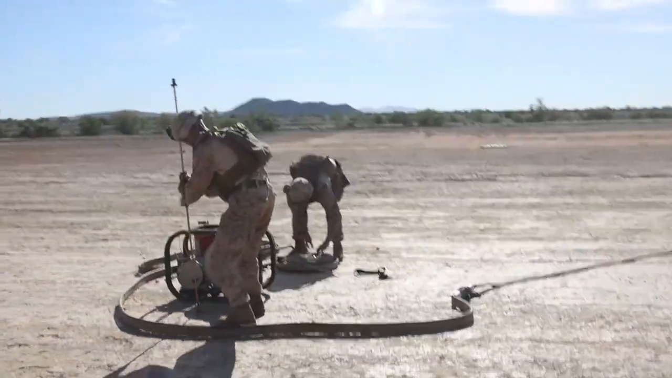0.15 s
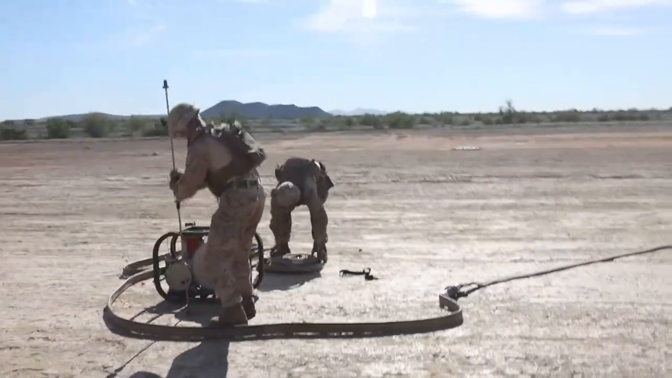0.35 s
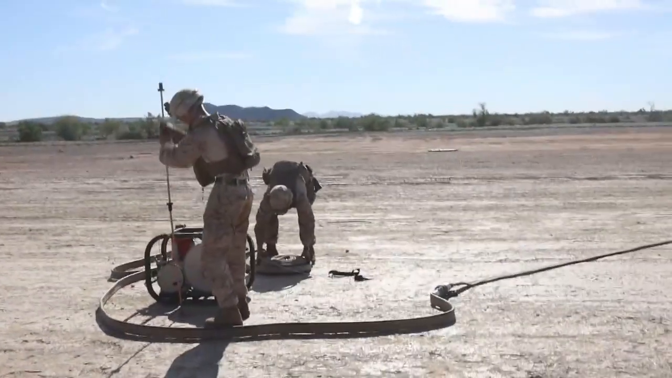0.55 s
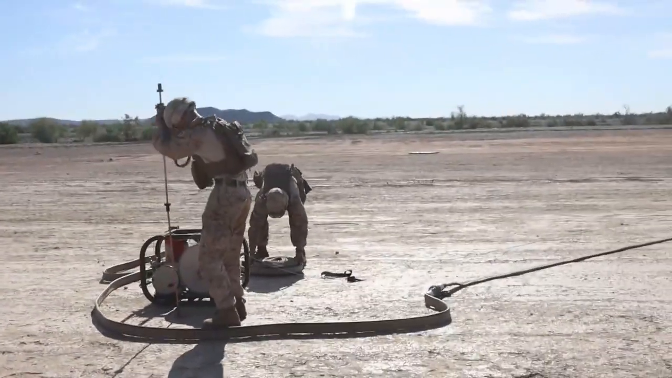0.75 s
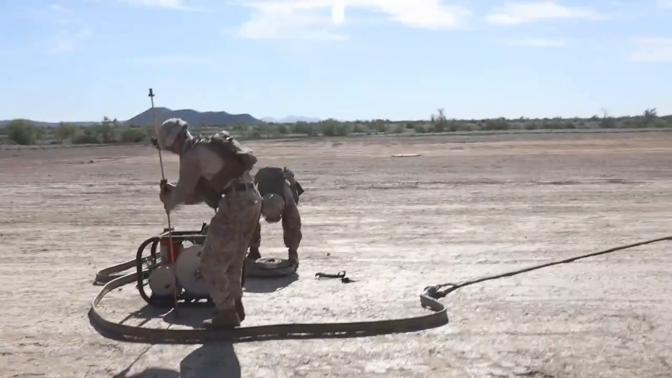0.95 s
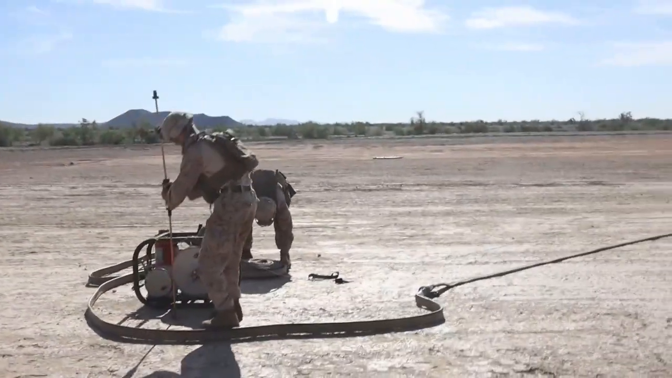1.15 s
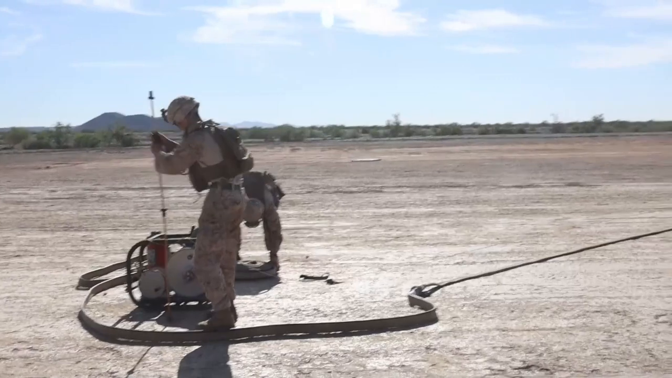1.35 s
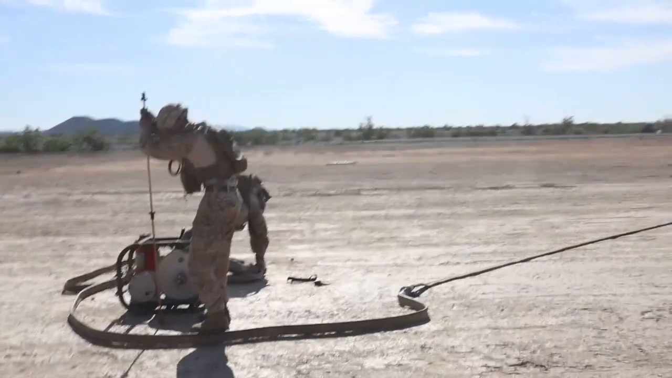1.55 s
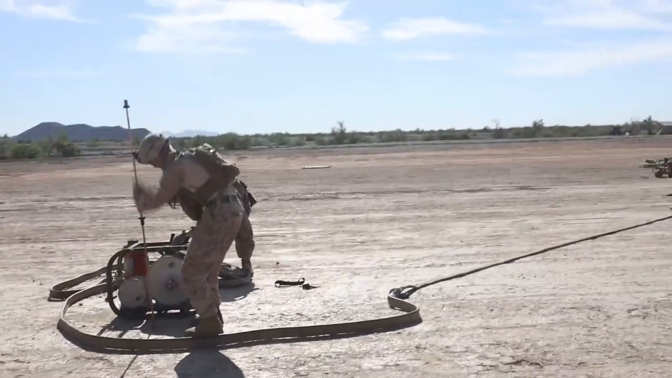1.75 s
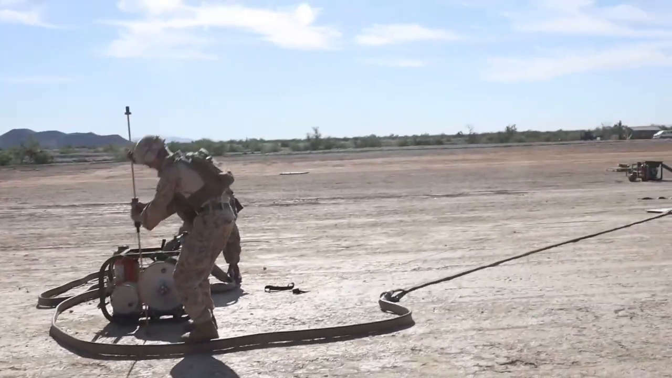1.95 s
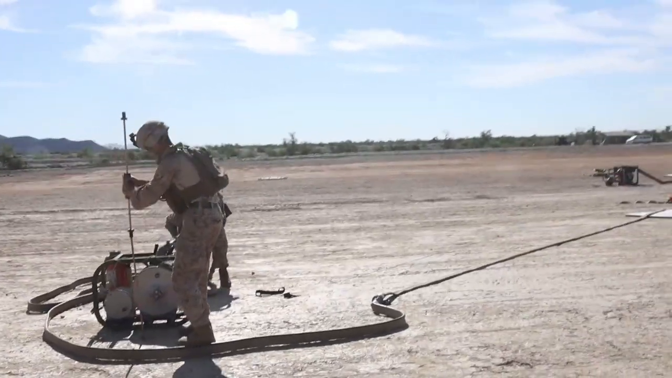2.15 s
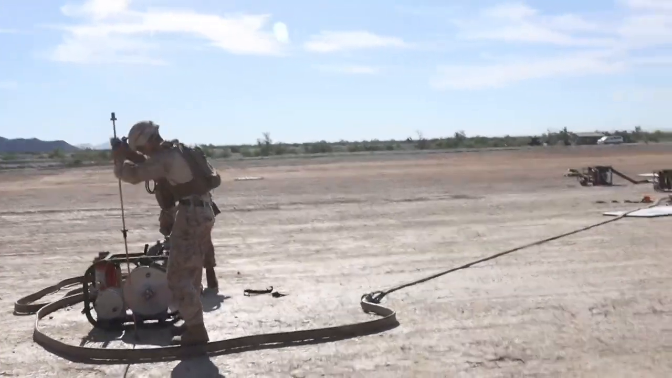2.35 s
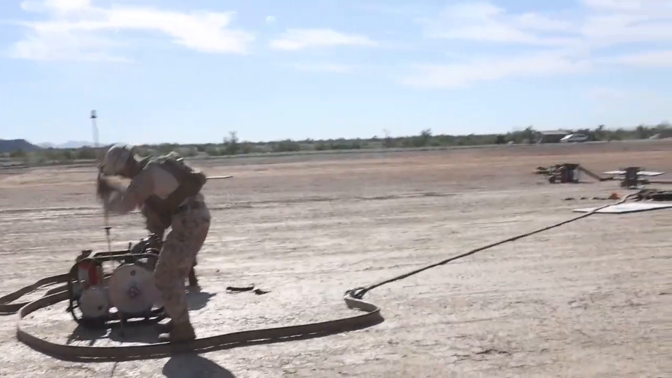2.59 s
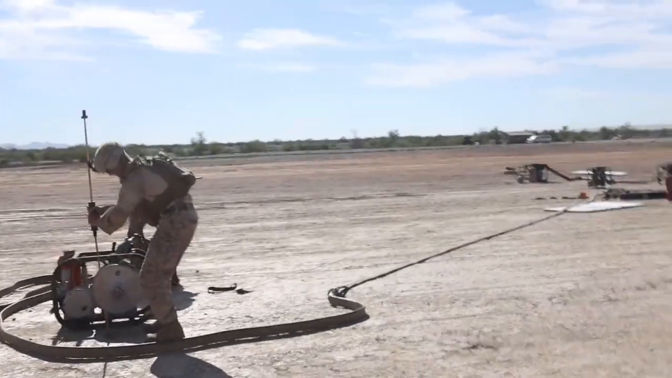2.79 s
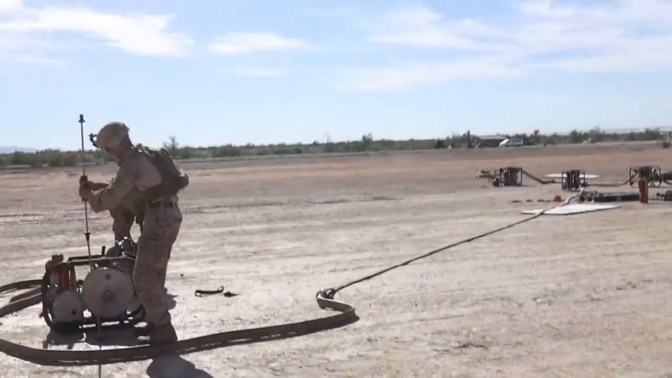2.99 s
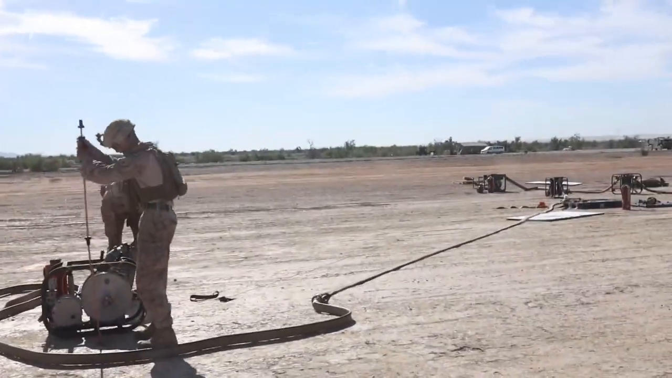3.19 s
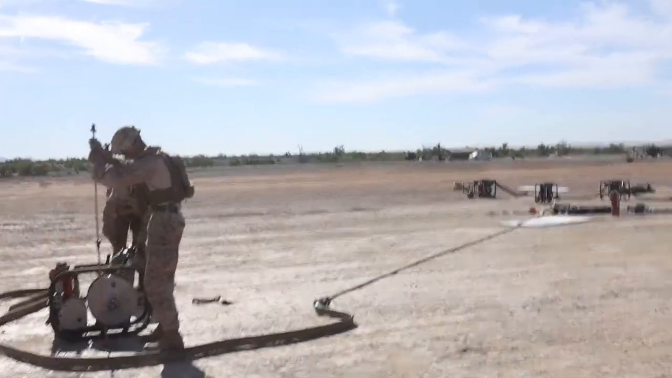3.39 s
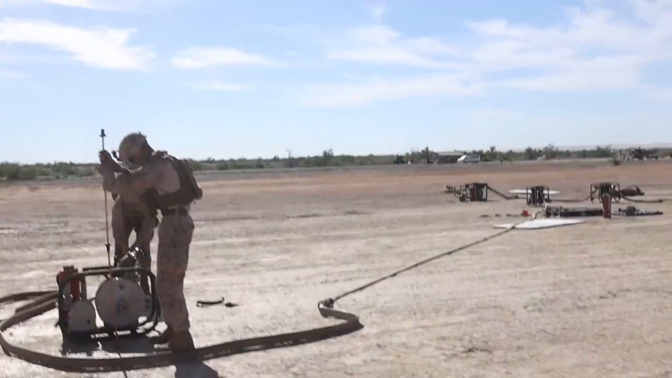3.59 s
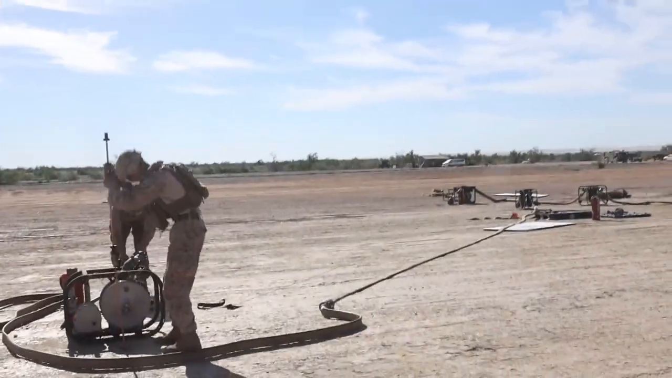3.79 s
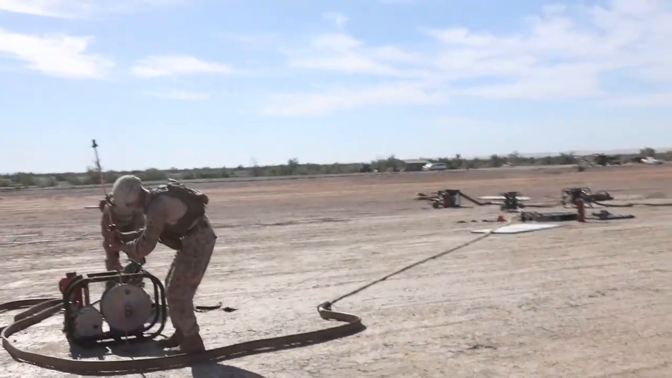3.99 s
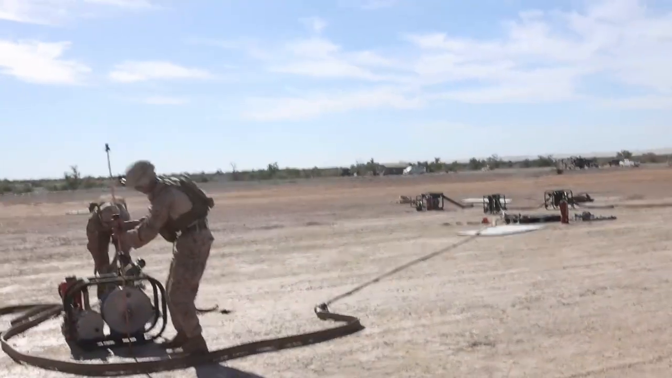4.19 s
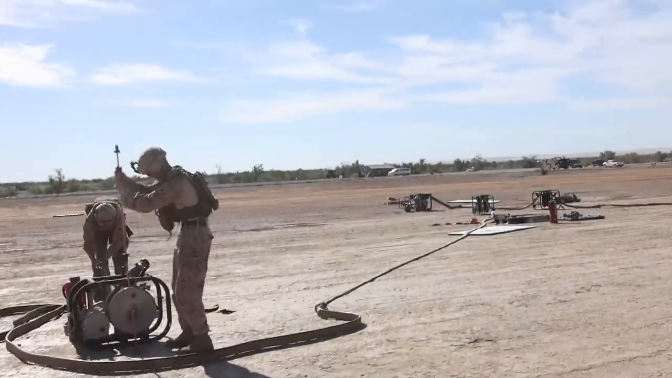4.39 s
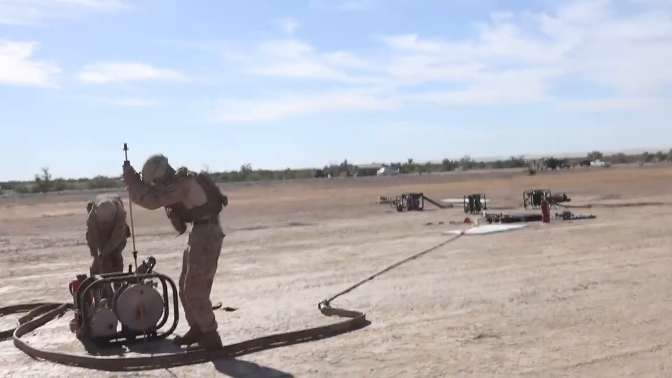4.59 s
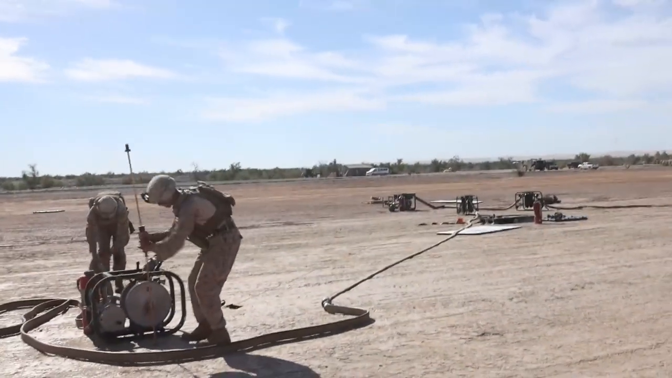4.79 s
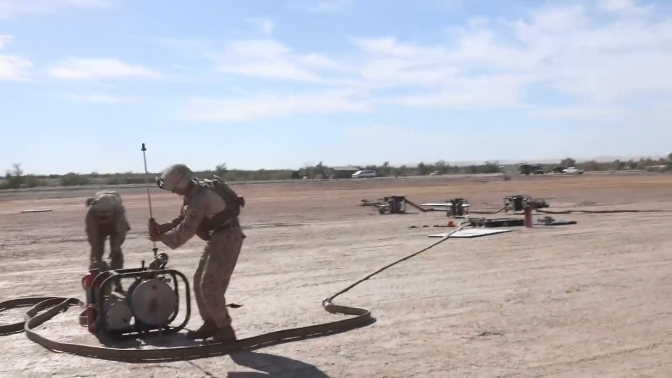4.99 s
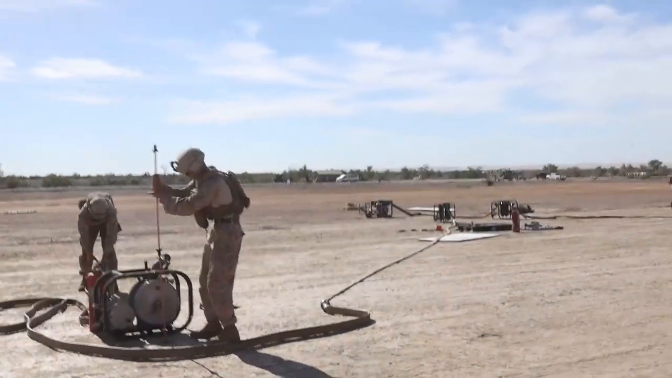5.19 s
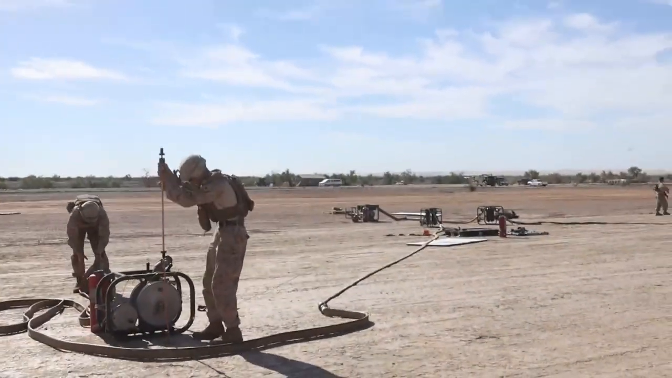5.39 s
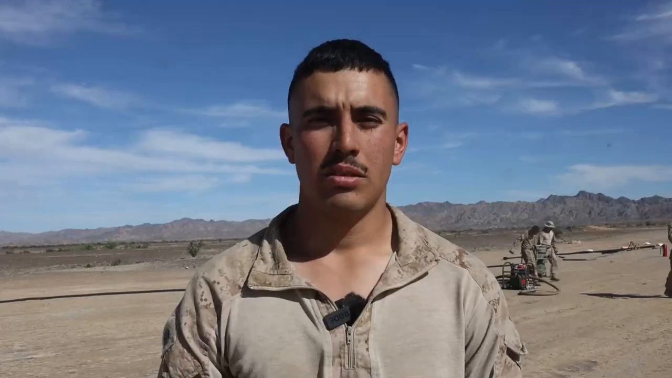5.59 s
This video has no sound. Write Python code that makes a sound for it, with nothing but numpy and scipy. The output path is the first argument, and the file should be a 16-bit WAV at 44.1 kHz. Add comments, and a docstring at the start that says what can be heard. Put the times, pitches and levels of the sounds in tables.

```python
"""Hammering a steel rod into the ground

Six blows of a sliding hammer drive an earthing rod into dry, open ground. Each time the weight
chatters on its stop, rings the rod and hops twice. Between blows it is dragged up and thrown down,
scraping and clinking, and now and then a boot scuffs. Wind buffets the microphone's two openings
(ports), mostly the right one, and dies down over a faint, far rumble."""
import sys
import numpy as np
from scipy import signal
from scipy.fft import rfft, irfft
from scipy.io import wavfile
from scipy.ndimage import uniform_filter1d

SR = 44100
rng = np.random.default_rng(int(sys.argv[2]) if len(sys.argv) > 2 else 0)


def dump_mix(stems):
    """Bounce the given channels to the path in sys.argv[1] as a 16-bit WAV at rate SR."""
    frames = np.atleast_2d(stems).T  # one column per channel
    limited = np.clip(frames, -1, 1)  # hard clip at full scale
    pcm = np.round(limited * 32767).astype(np.int16)
    wavfile.write(sys.argv[1], SR, pcm)


N = 249165
T = np.arange(N) / SR
EVENT_T = T[:SR // 4]  # time within one short sound; a "t60" is the time it takes to fade by 60 dB

# tone of the far rumble (frequency [Hz], level [dB])
RUMBLE_TONE = [(25, -17.5), (60, -4.5), (120, 0.5), (250, -6), (450, -16.5), (800, -24), (1500, -30.5),
               (3000, -36), (8000, -44.5), (15000, -51.5)]
# tone of the swirling air in a strong gust (frequency [Hz], level [dB])
GUST_TONE = [(20, -25), (45, -17), (90, -1.5), (190, 1.5), (330, -3), (550, -12), (800, -22), (1200, -36),
             (2000, -50.5), (4000, -82)]
# wind strength on each port (time [s], relative level [dB])
LEFT_WIND = [(0.0, -51.5), (0.16, -71.5), (2.56, -71.5), (2.72, -63.5), (2.92, -53), (3.24, -54.5),
             (3.32, -51), (3.52, -69), (3.68, -57), (4.0, -70), (4.28, -65), (4.64, -67.5), (4.88, -66.5),
             (5.64, -75)]
RIGHT_WIND = [(0.0, -43.5), (0.72, -39.5), (1.2, -45), (1.68, -41.5), (1.96, -46), (2.08, -44), (2.48, -42),
              (3.16, -58), (3.4, -49.0), (3.56, -56.5), (3.84, -47.5), (3.96, -67), (4.12, -60.5),
              (4.32, -68), (4.48, -66), (5.32, -65), (5.36, -65), (5.64, -83)]
# sharp swirls of air on the right port (time [s], level [dB])
SWIRLS = [(0.129, -29.5), (0.427, -27.5), (0.487, -28), (0.68, -23.5), (0.845, -32), (0.952, -19.5),
          (0.967, -26), (1.047, -29.5), (1.514, -27), (1.558, -29.5), (1.681, -26.5), (2.107, -30),
          (2.276, -29.5), (2.355, -28)]
# low puffs of air and dull scuffs of boots
# (time [s], left level [dB], right level [dB], upper edge [Hz], t60 [s])
PUFFS_AND_SCUFFS = [(0.070, -49, -38.5, 600, 0.045), (0.696, -59, -34.5, 457, 0.034),
                    (1.372, -51, -51, 503, 0.033), (1.923, -54, -39.5, 444, 0.054),
                    (2.968, -40, -55, 284, 0.059), (3.154, -44, -60.5, 482, 0.046),
                    (4.111, -67, -50.5, 248, 0.041), (4.264, -51.5, -65, 344, 0.15),
                    (4.436, -53, -52, 600, 0.15), (5.012, -51.5, -53.5, 450, 0.058),
                    (5.037, -51.5, -51, 714, 0.067), (5.173, -70, -59, 910, 0.034),
                    (5.265, -64.5, -56.5, 302, 0.068), (5.37, -78, -56, 256, .06)]
# the rod's own ringing tones (frequency [Hz], level [dB], t60 [s])
ROD_TONES = [(765, -10, .05), (2045, 2, .09), (2260, -8, .06), (2620, -7, .05), (3455, 4, .11),
             (4100, -8, .05), (4660, -8, .06), (4975, -2, .075), (5820, 0, .07), (6035, -5, .06),
             (6440, -5, .06), (6630, -4, .06), (6790, -4, .05), (7415, -7, .08), (7790, -7, .08),
             (8025, -7, .08), (8540, -4, .11), (9460, -9, .09), (9590, -10, .08), (10550, -12, .08),
             (11600, -7, .09), (12340, -11, .08), (12500, -10, .08), (13200, -11, .06), (13950, -10, .1)]
# tone of steel rubbing on steel (frequency [Hz], level [dB])
SCRAPE_TONE = [(300, -12), (800, -4), (1400, -1.5), (2300, 3), (3000, -0.5), (4000, 0), (6500, -5),
               (9000, -14.5), (15000, -22.5)]
# the weight is dragged up (middle time [s], length [s], hiss [dB], singing [dB])
WEIGHT_LIFTS = [(0.083, 0.18, -77.5, -83), (0.54, 0.29, -82, -87.5), (1.325, .17, -70, -70.5),
                (2.235, 0.32, -85, -80.5), (3.053, 0.18, -77.5, -74), (3.389, .3, -84, -93),
                (4.354, 0.29, -83, -73.5), (5.186, 0.28, -83, -74.5)]
# the throw before each blow and the hop after it (singing [dB], flight [s], relative landing level [dB])
WEIGHT_THROWS = [(-77.5, .05, -53), (-79.5, .0833, -50.5), (-79.5, .0764, -53), (-81, .0812, -49),
                 (-69.5, .088, -54), (-65, .1162, -68.5)]
# tone of a light sideways knock (frequency [Hz], level [dB])
KNOCK_TONE = [(200, -19.5), (900, -7), (1300, 1.5), (2100, -4), (2900, 5), (3450, 2), (4200, 5), (6200, 10),
              (9500, -15), (14000, -19), (16000, -18)]
# light knocks of the weight on the rod, and a few dull boot scuffs
# (time [s], relative level [dB], brightness [dB per octave])
KNOCKS_AND_SCUFFS = [(0.0527, -61.5, -3.5), (0.6095, -64, -5), (1.1269, -56, -6), (1.1995, -54.5, -1.5),
                     (1.2490, -53, 0.5), (1.3, -54.5, 1), (1.3462, -55.5, -4.5), (1.439, -61, -1),
                     (1.794, -70, -4), (2.0812, -58.5, -1.5), (2.114, -62.5, -1.5), (2.9327, -58, 0.5),
                     (3.0700, -65, 2), (3.2441, -71.5, -9.5), (3.4015, -64.5, -8.5), (3.6650, -67, 0),
                     (4.4000, -71, 0), (4.803, -54.5, -0.5), (5.0630, -66, -6), (5.1922, -61.5, 2)]
# a blow's crack: many short-lived tones between the ringing ones (frequency [Hz], level [dB])
CRACK_TONE = [(60, -20), (160, 0), (450, -17), (780, -7), (1150, -8.5), (1600, -4), (2200, -2),
              (2900, -3.5), (3600, -2.5), (4400, 1), (6300, -4), (9500, -8), (14500, -12), (16000, -24.5)]
# the close tones that the weight drives hardest (frequency [Hz], level [dB])
CLANG_TONES = [(3270, -10), (3450, 0), (3640, -14)]
# hammer blows (time [s], level [dB], clang [dB], upper tone [dB], brightness [dB per octave],
# rebound delay [s], rebound level [dB])
HAMMER_BLOWS = [(0.193, -29, -6, -8, 0, 0.0071, -3), (0.9872, -29.5, 1, -10.5, 0, 0.0092, -6),
                (1.8208, -30, -3.5, -12, -0.4, 0.0054, -2.5), (2.6622, -28.5, 6.5, -9.5, -1, 0.0062, -4.5),
                (3.9845, -30.5, 4.5, -14, 1, .0064, -6), (4.821, -30, 6.5, -18.5, -0.1, 0.0071, -6.5)]

SING_HZ, SING_T60_S = 3450, .045  # the rod's main tone, which sings on after a slip or knock
STRONG_WIND_DB = -39


def undb(db):
    """Turn decibels into a gain."""
    return 10 ** (np.asarray(db) / 20)


def unit(x):
    """Scale to an average power of 1."""
    return x / np.sqrt(np.mean(x ** 2))


def burst(x):
    """Scale to the energy of 10 ms at power 1."""
    return x / np.sqrt(np.sum(x ** 2) / (SR / 100))


def level_at(points, hz):
    """Read a curve of (frequency [Hz], level [dB]) points, spaced by octaves."""
    frequencies, db = np.transpose(points)
    return np.interp(np.log(hz + 1), np.log(frequencies), db)


def colour(x, points, size=2048):
    """Filter a sound to follow a tone curve."""
    cepstrum = irfft(np.log(undb(level_at(points, np.fft.rfftfreq(size, 1 / SR)))))
    cepstrum[1:size // 2] *= 2  # folded forward, so the filter never rings ahead of the sound
    cepstrum[size // 2 + 1:] = 0
    return signal.fftconvolve(x, irfft(np.exp(rfft(cepstrum))))[:len(x)]


def tilt(x, octave_db):
    """Brighten or dull a sound around 4 kHz."""
    return colour(x, [(1000, -2 * octave_db), (16000, 2 * octave_db)])


def wander(per_s, size=N):
    """A smooth random wobble, about 1 in size."""
    hold = max(int(SR / per_s), 2)
    steps = np.repeat(rng.standard_normal(size // hold + 1), hold)
    return unit(uniform_filter1d(uniform_filter1d(steps, hold), hold)[:size])


def fade(t60, start=0):
    """A level that jumps to 1 at the start time and dies away."""
    return (EVENT_T >= start) * np.exp(-np.log(1000) * np.abs(EVENT_T - start) / t60)


def add(out, s, x):
    """Mix a sound in at s seconds."""
    i = max(int(s * SR), 0)
    out[..., i:i + x.shape[-1]] += x[..., :N - i]


def far_rumble(level_db=-72, side_db=-5):
    """The open plain rumbles faintly, a little differently left and right."""
    middle, side = (unit(colour(rng.standard_normal(N), RUMBLE_TONE)) for _ in range(2))
    return undb(level_db) * (middle + undb(side_db) * side * np.array([[1], [-1]]))


def gusts(curve, steady_db=1.5, fitful_db=3.5, weak_below_db=-60):
    """Wind strength in dB: fairly steady when strong, fitful when weak."""
    db = np.interp(T, *np.transpose(curve))
    weak = 1 / (1 + undb(db - weak_below_db))
    return db + (steady_db * (1 - weak) + fitful_db * weak) * wander(per_s=8.2)


def buffeting(level_db):
    """Air churns on one port: faster air is louder and sheds smaller, higher-pitched swirls."""
    speed = np.maximum(2 ** ((level_db - STRONG_WIND_DB) / 19), .42)  # an octave higher every 19 dB
    flutter = wander(per_s=170)
    out, power = 0, 0
    for hz in 28 * 2 ** (np.arange(14) / 2):
        gain = undb(level_at(GUST_TONE, hz / speed))
        half_octave = signal.butter(3, [hz / 1.19, hz * 1.19], "band", fs=SR, output="sos")
        band = signal.sosfilt(half_octave, rng.standard_normal(N))
        spurts = unit(undb(min(hz / 90, 5.5) * flutter))  # small swirls arrive in spurts
        out += gain * band * spurts
        power += gain ** 2 * np.var(band)
    return out / np.sqrt(power) * undb(level_db - 1)


def swirl(hz):
    """One small swirl of air crosses a port: a single swing of pressure."""
    position = 2 * np.pi * hz * EVENT_T[:SR // 40] - 4
    return position * np.exp(-position ** 2 / 2)


def crackle(level_db, count=330, base_hz=330):
    """Stray swirls of all sizes pop on a port, sharper in a strong gust."""
    out = np.zeros(N)
    for when, size, pitch, side in rng.random((count, 4)):
        wind_db = level_db[int(when * N)]
        octaves = pitch - .5 + max((wind_db - STRONG_WIND_DB) / 24, -1)
        pop_db = wind_db - 3 - 3 * np.log(max(size, .015))  # many small pops, a few big ones
        add(out, when * N / SR, np.sign(side - .5) * undb(pop_db) * swirl(base_hz * 2 ** octaves))
    return out


def wind_and_scuffs():
    """Air churns on each port separately, with single swirls, low puffs and dull boot scuffs on top."""
    levels = [gusts(curve) + .98 for curve in (LEFT_WIND, RIGHT_WIND)]
    out = np.array([buffeting(db) + crackle(db) for db in levels])
    for s, db in SWIRLS:
        add(out[1], s, undb(db) * swirl(hz=320))
    for s, left_db, right_db, edge_hz, t60 in PUFFS_AND_SCUFFS:
        band = signal.butter(2, [70, edge_hz], "band", fs=SR, output="sos")
        for port, db in zip(out, (left_db, right_db)):
            noise = fade(t60) * rng.standard_normal(len(EVENT_T))
            add(port, s, undb(db) * burst(signal.sosfilt(np.vstack([band, band]), noise)))
    return out


def paths_to_ports(x, right_lag_s=.000082, ground_s=.00133, ground_db=-11, scatter_db=-11):
    """The rod's sound comes from the left and bounces off hard soil; nearby gear scatters the treble."""
    scatter = rng.standard_normal((2, len(EVENT_T))) * fade(t60=.008)
    scatter *= undb(scatter_db) / np.linalg.norm(scatter, axis=1, keepdims=True)
    paths = signal.sosfilt(signal.butter(3, 4200, "high", fs=SR, output="sos"), scatter)
    samples = np.arange(128) - 4
    direct = np.sinc([samples, samples - right_lag_s * SR])
    bounce = undb(ground_db) * np.sinc(samples - ground_s * SR)
    paths[:, :len(samples)] += direct + bounce
    return signal.fftconvolve(x[None], paths, axes=1)[:, :N]


def rod_ring():
    """The rod rings; the grip and the weight's place shift each tone's level and pitch every time."""
    chance = rng.standard_normal((len(ROD_TONES), 3)) * [3, 1, .003]
    return sum(undb(db + more_db) * fade(t60) * np.sin(2 * np.pi * (hz * (1 + detune) * EVENT_T + phase))
               for (hz, db, t60), (more_db, phase, detune) in zip(ROD_TONES, chance))


def rod_sing():
    """The rod's main tone alone, dying away."""
    return fade(SING_T60_S) * np.sin(2 * np.pi * SING_HZ * EVENT_T)


def shaking(contacts, t60):
    """Contacts (time [s], level [dB]) shake the rod; their waves are out of step, so energies add."""
    return np.sqrt(sum((undb(db) * fade(t60, s)) ** 2 for s, db in contacts))


def clink(bright_db, ring_db=-1, sing_db=-5, rise_s=.00091):
    """The weight knocks one side of the rod, then the other; made very dull, it serves as a boot scuff."""
    contacts = [(0, 0), (.0039 * rng.uniform(.24, 1.2), rng.uniform(-4.5, 2))]
    tone = [(hz, db + 2.5 * rng.standard_normal()) for hz, db in KNOCK_TONE]  # varies with the spot hit
    crack = colour(shaking(contacts, t60=.027) * rng.standard_normal(len(EVENT_T)), tone)
    ring = rod_ring() * fade(t60=.045)  # the hand damps the ring
    knock = tilt(burst(crack) + undb(ring_db) * burst(ring), bright_db)
    return (knock + undb(sing_db) * burst(rod_sing())) * (1 - np.exp(-EVENT_T / rise_s))


def lift_taps(count=2, above_hiss_db=5, spread_db=3):
    """The weight wobbles against the rod in every lift."""
    out = np.zeros(N)
    for s, length, hiss_db, _ in WEIGHT_LIFTS:
        for when, size in rng.uniform(-1, 1, (count, 2)):
            tap_db = hiss_db + above_hiss_db + spread_db * size
            add(out, s + when * length / 2, undb(tap_db) * clink(bright_db=-7.5))
    return out


def slide_levels(throw_hiss_db=-65.5, rise_db_per_s=139, fall_db_per_s=106, lift_edge_db=-6.5):
    """Gains of hiss and singing: the weight speeds up to each blow, rests, and is lifted in one pull."""
    power = undb([[-95.5], [-102]]) ** 2  # the held weight never lies quite still
    for (s, *_), (sing_db, *_) in zip(HAMMER_BLOWS, WEIGHT_THROWS):
        swell_db = np.minimum(rise_db_per_s * (T - s), fall_db_per_s * (s - T))
        power = power + (undb([[throw_hiss_db], [sing_db]]) * undb(swell_db)) ** 2
    for s, length, hiss_db, sing_db in WEIGHT_LIFTS:
        pull_db = lift_edge_db * np.minimum((2 * (T - s) / length) ** 2, 20)
        power = power + (undb([[hiss_db], [sing_db]]) * undb(pull_db)) ** 2
    return np.sqrt(power)


def sliding(ring_db=-13, grain_db=2, judder_db=4):
    """Steel rubs on dusty steel: countless tiny slips hiss and keep the rod's main tone singing."""
    hiss_gain, sing_gain = slide_levels()
    judder = wander(per_s=60)  # the weight catches and lets go
    slips = rng.standard_normal(N) * undb(grain_db * wander(per_s=900) + judder_db * judder)
    sing = signal.fftconvolve(slips, rod_sing())[:N]
    ring = signal.fftconvolve(slips, rod_ring() * fade(t60=.01))[:N]
    hiss = unit(colour(slips, SCRAPE_TONE)) + undb(ring_db) * unit(ring)
    return hiss_gain * hiss + sing_gain * unit(sing)


def blow(clang_db, upper_db, bright_db, rebound_s, rebound_db, ring_db=-6, upper_hz=5820, rise_s=.0004):
    """The weight lands, seats, rebounds and settles; each brief contact cracks and rings the steel."""
    contacts = [(0, 0), (.0015, 1), (rebound_s, rebound_db), (.024, -21)]
    impact = shaking(contacts, t60=.036)
    chatter = undb(-17 + 2.5 * wander(300, len(EVENT_T))) * fade(t60=.105)  # loose parts rattle out
    crack = colour(np.hypot(impact, chatter) * rng.standard_normal(len(EVENT_T)), CRACK_TONE)
    ring = rod_ring() * (impact + 1)  # hands and soil quickly soak up the first, strongest swing
    push = shaking(contacts, t60=.021)
    phase_per_hz = 2 * np.pi * EVENT_T * (1 + .0054 * rng.standard_normal())  # slightly off pitch
    tones = sum(undb(db) * np.sin(hz * phase_per_hz + 2 * np.pi * rng.random()) for hz, db in CLANG_TONES)
    clang = undb(clang_db) * burst(push * tones)
    upper = undb(upper_db) * burst(push * np.sin(upper_hz * phase_per_hz))
    strike = tilt(burst(crack) + undb(ring_db) * burst(ring), bright_db)
    return (strike + clang + upper) * (1 - np.exp(-EVENT_T / rise_s))


def hammering(clink_db=-2, second_hop_s=.02, second_hop_db=-12):
    """The weight slides, strikes and hops twice, with light knocks and a few boot scuffs in between."""
    out = sliding() + lift_taps()
    for (s, db, *manner), (_, flight_s, landing_db) in zip(HAMMER_BLOWS, WEIGHT_THROWS):
        add(out, s, undb(db) * blow(*manner))
        hop_db = landing_db + clink_db
        add(out, s + flight_s, undb(hop_db) * clink(bright_db=.4))
        add(out, s + flight_s + second_hop_s, undb(hop_db + second_hop_db) * clink(bright_db=-1))
    for s, db, bright_db in KNOCKS_AND_SCUFFS:
        add(out, s, undb(db + clink_db) * clink(bright_db))
    return paths_to_ports(out)


def scene():
    """Hammer, rod and boots in the wind, over the far rumble."""
    return hammering() + wind_and_scuffs() + far_rumble()


def record(dry, low_cut_hz=42, ceiling=.2, top_hz=15000):
    """The microphone thins the deepest rumble, rounds the peaks of the blows and cuts the top treble."""
    thinned = signal.sosfilt(signal.butter(2, low_cut_hz, "high", fs=SR, output="sos"), dry)
    rounded = ceiling * np.tanh(thinned / ceiling)
    return signal.sosfilt(signal.ellip(8, .2, 70, top_hz, fs=SR, output="sos"), rounded)


dry = scene()
out = record(dry)
dump_mix(out)
```